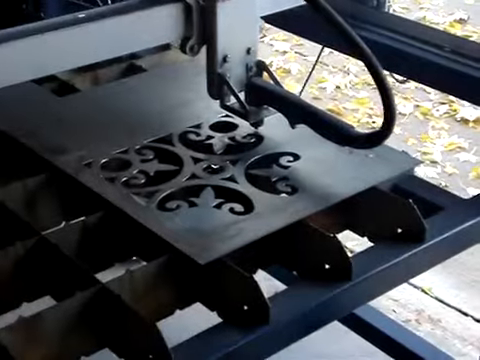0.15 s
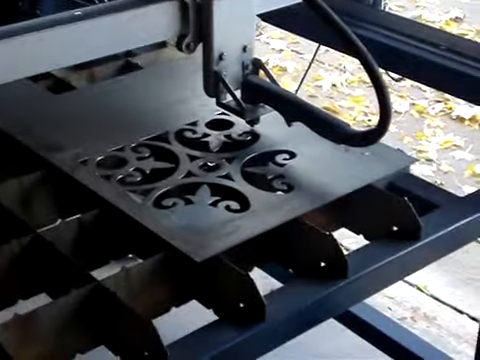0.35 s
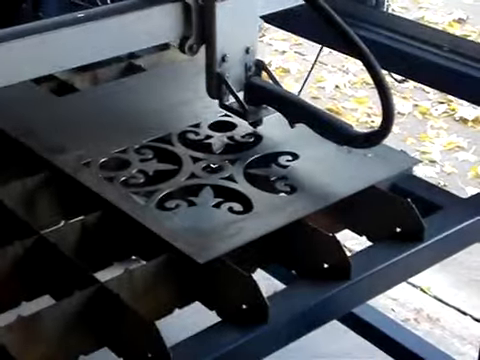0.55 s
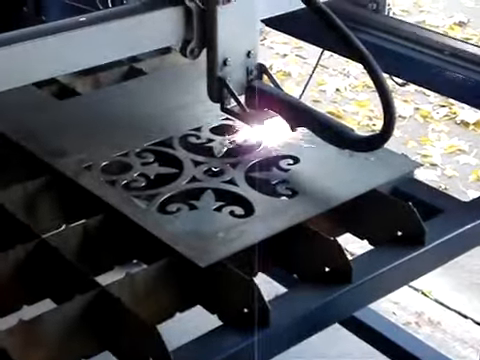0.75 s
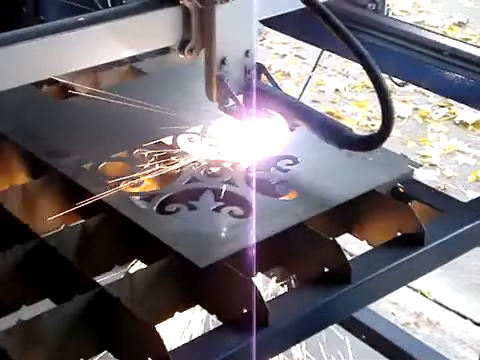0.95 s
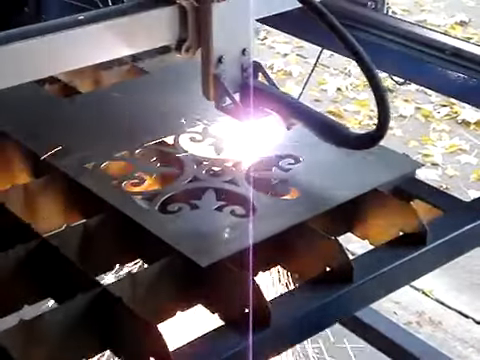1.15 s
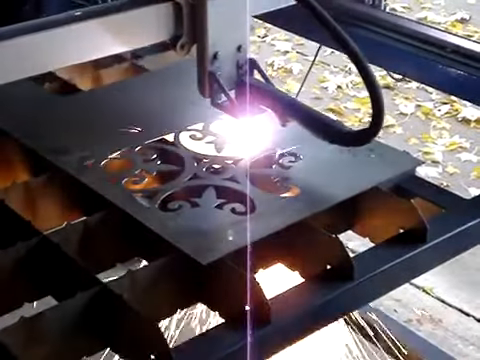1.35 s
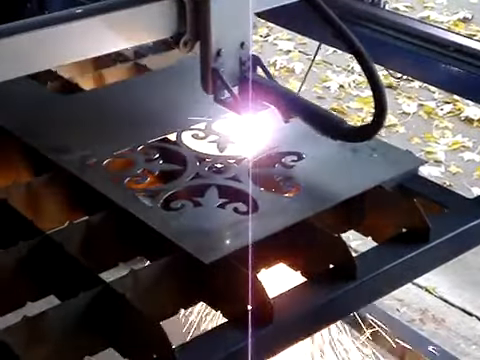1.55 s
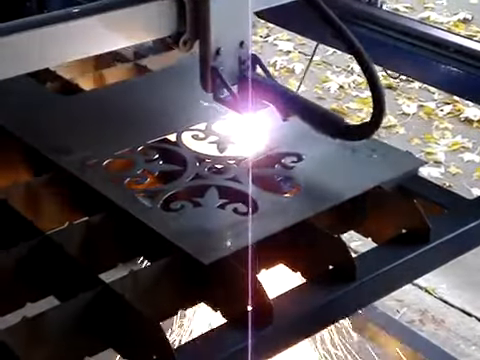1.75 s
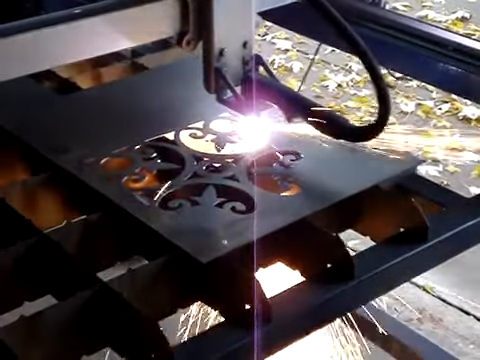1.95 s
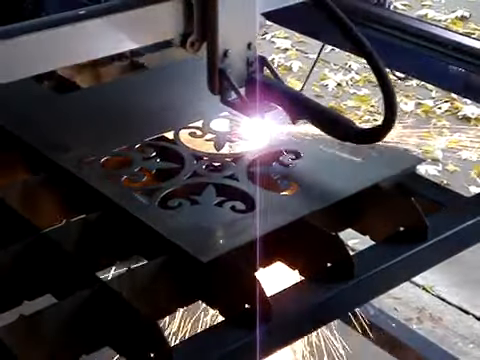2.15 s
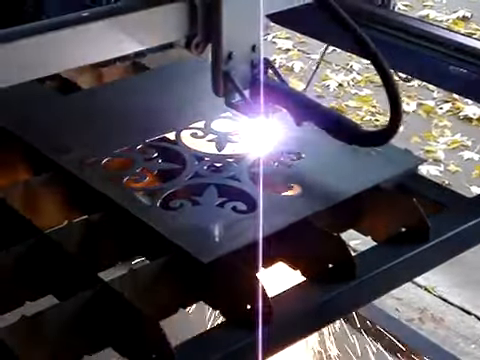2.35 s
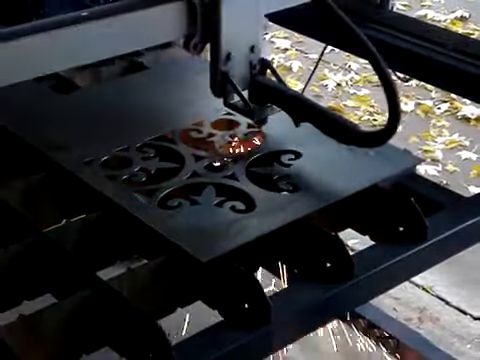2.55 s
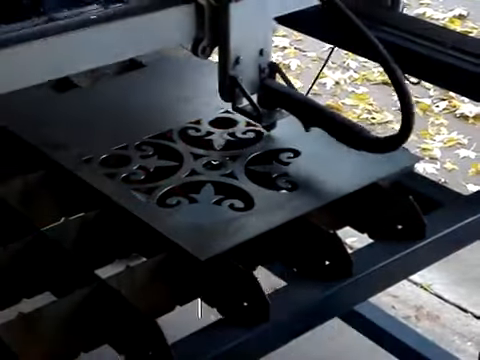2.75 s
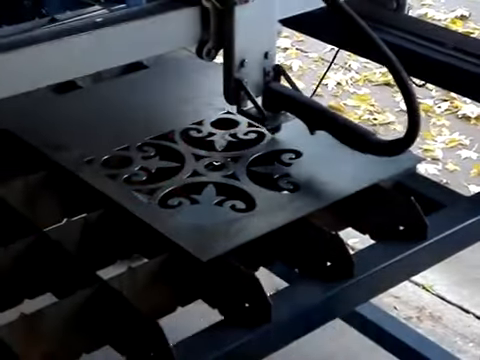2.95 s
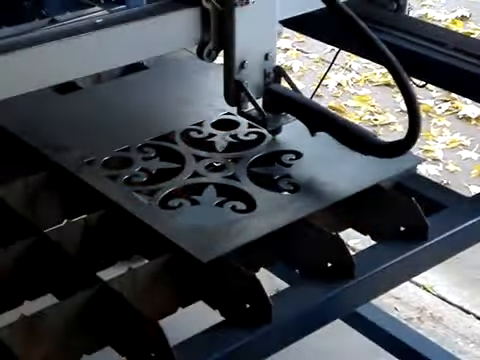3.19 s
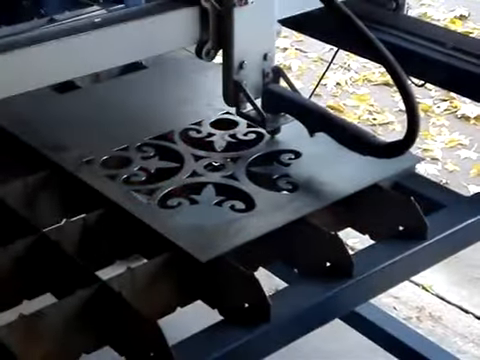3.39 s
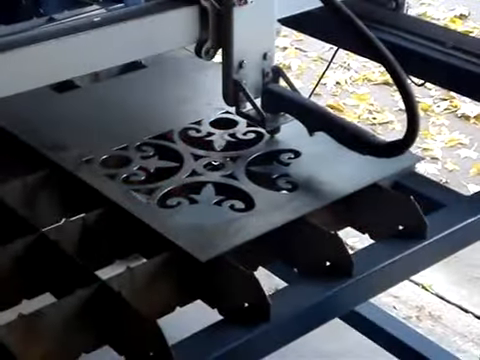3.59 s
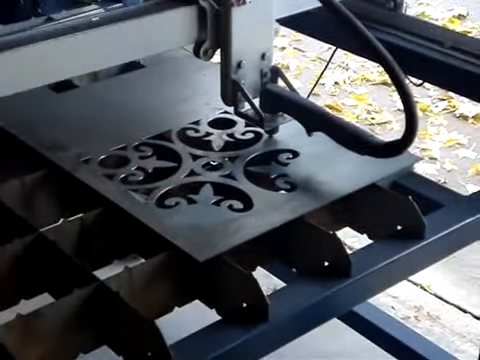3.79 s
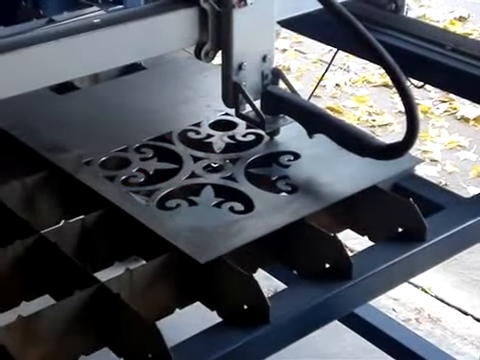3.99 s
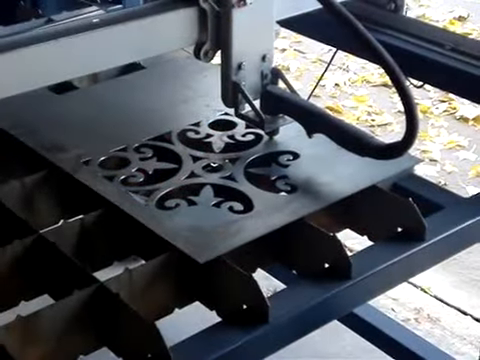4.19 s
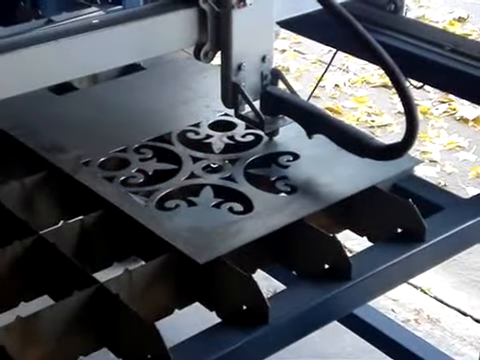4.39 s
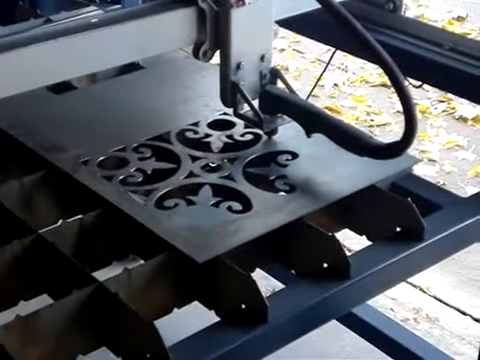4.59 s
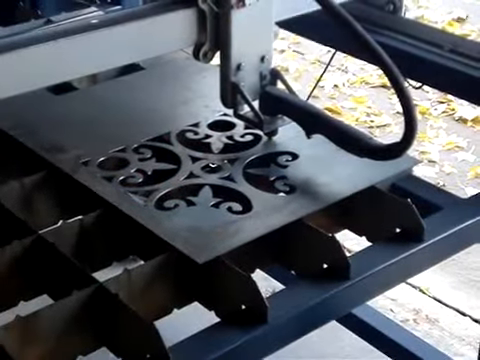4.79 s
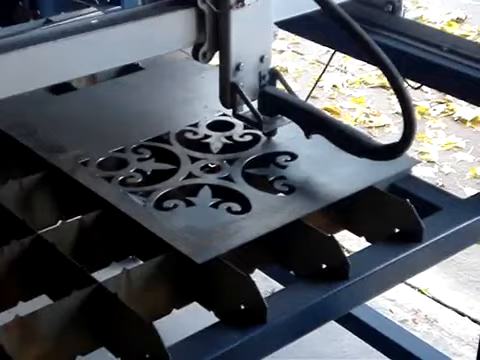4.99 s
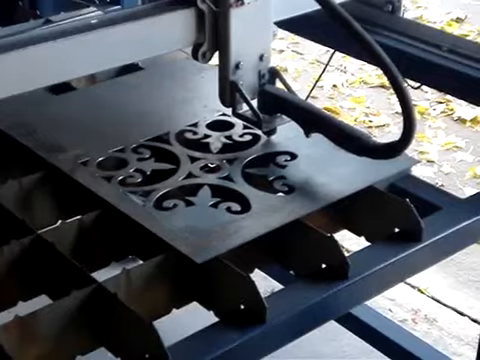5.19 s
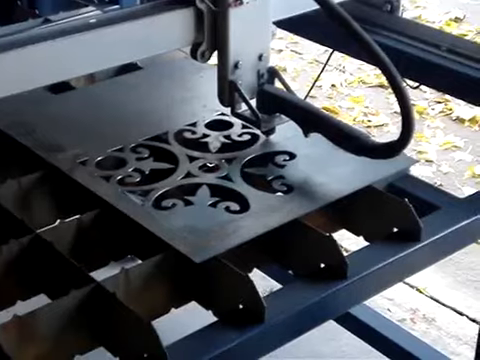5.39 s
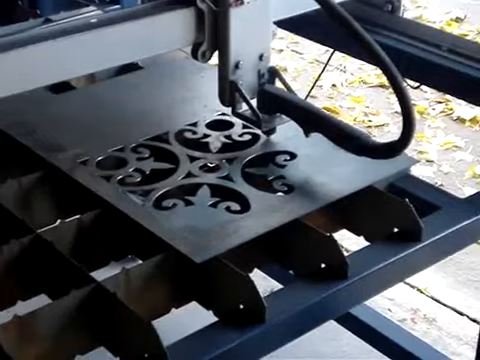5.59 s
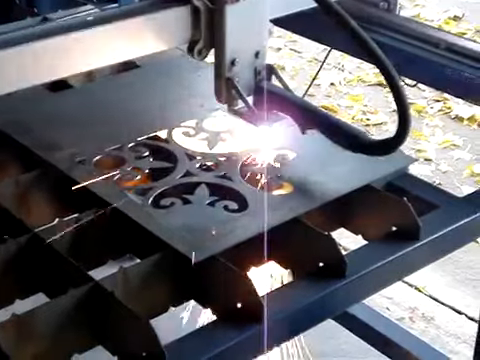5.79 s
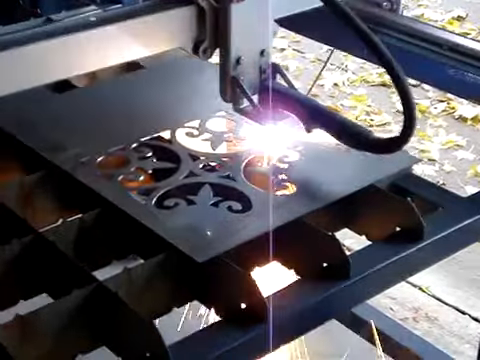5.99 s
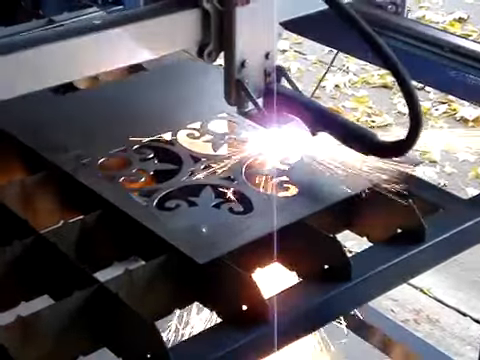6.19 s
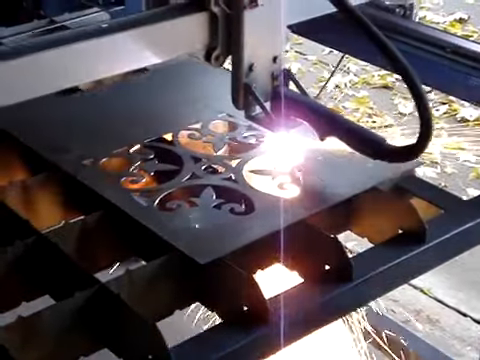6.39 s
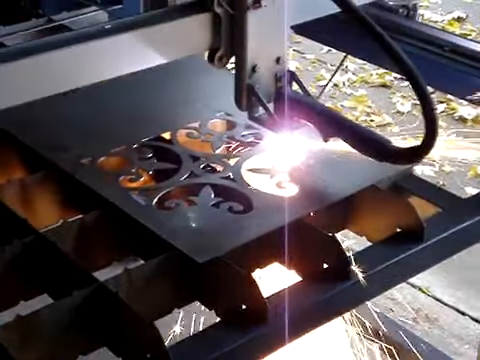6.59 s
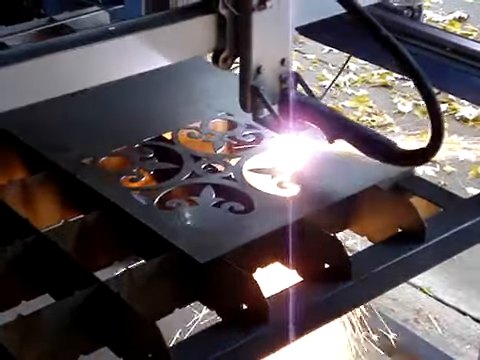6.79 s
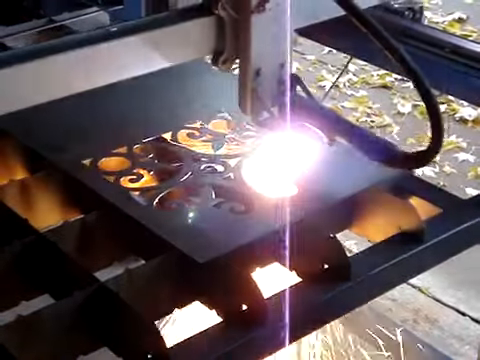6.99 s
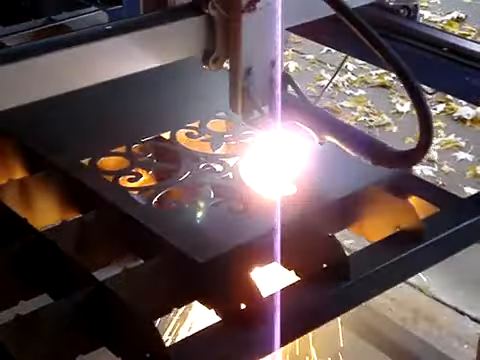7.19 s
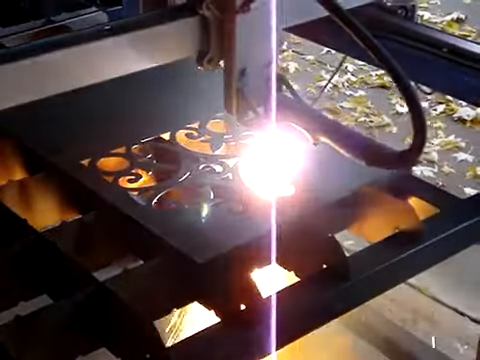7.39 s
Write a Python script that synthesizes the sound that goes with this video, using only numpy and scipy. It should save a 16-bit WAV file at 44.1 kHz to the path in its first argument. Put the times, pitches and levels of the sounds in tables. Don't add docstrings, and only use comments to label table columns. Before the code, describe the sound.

Outdoors, a compressor drones under a bright air jet; a plasma arc thumps on, cuts with rough roar, goes out, pauses, and cuts again.

```python
import sys
import numpy as np
from scipy import signal
from scipy.io import wavfile
from scipy.ndimage import uniform_filter1d

SR = 44100
rng = np.random.default_rng(int(sys.argv[2]) if len(sys.argv) > 2 else 0)


def generate_wav(signal):
    frames = np.transpose(np.atleast_2d(signal))
    scaled = np.clip(frames, -1, 1) * 32767
    pcm = np.round(scaled).astype(np.int16)
    wavfile.write(sys.argv[1], SR, pcm)


def nominal_scale(level):
    x = np.asarray(level, float) / 20
    return 10 ** x


N = 328545

# start_s, end_s
CUTS = [
    (.89, 2.65),
    (5.8, 7.5),
]
ARC_OUT_S = 2.625

# after_strike_s, jet_db, roar_db
PIERCE = [
    (-.6, -40.5, -45),
    (-.45, -40.5, -40),
    (-.39, -42.5, -42.5),
    (-.33, -46, -41),
    (-.18, -44.2, -40.5),
    (-.01, -41.5, -37.5),
    (.02, -38.5, -56),
    (.057, -43.5, -51),
    (.08, -40, -43),
]
# after_arc_out_s, jet_db, roar_db
SHUT_OFF = [
    (-.05, -39, -44),
    (0, -42, -40.5),
    (.055, -45.5, -50),
    (.16, -43, -45),
    (.3, -40.5, -45.5),
]
# time_s, bite_db
BITE = [(1.18, .5), (1.5, -2.5), (1.75, 1), (1.9, -2.5), (2.1, 2), (2.45, -0.5), (6.2, 4), (6.4, 2),
        (6.9, 2), (7.1, 1.5), (7.45, -3)]

# frequency_hz, density_db (per Hz)
JET_SPECTRUM = [(1470, -18.5), (2500, -9), (2690, -5.5), (2910, -7), (3270, -12.5), (4260, -8.5),
                (4590, -5), (5700, -3.5), (7660, -2.5), (9080, -11.5), (9720, -19.5), (12600, -51),
                (21400, -120)]
# frequency_hz, density_db (per Hz)
ROAR_SPECTRUM = [(350, -27), (650, -8.5), (900, -6), (1400, -2.5), (2000, -4), (2800, -4.5), (3400, -3.5),
                 (4400, -4.5), (5600, -17.5), (7000, -25)]

# start_before_s, end_before_s, start_hz, end_hz, width_hz, level_db
SINKING_WHISTLES = [
    (.55, .29, 5800, 4300, 1700, -34),
    (.32, -.005, 5000, 4750, 1500, -35.5),
]
RISING_WHISTLE = 0.3, 4999, 5331.5, 1300, -36.5
# start_s, end_s, pitch_hz, width_hz, level_db
KERF_WHISTLES = [(.95, 1.705, 3920, 130, -43.5), (1.0, 1.203, 4600, 350, -42), (1.1, 2.3, 1700, 200, -46.5),
                 (1.24, 1.41, 6220, 200, -52), (1.45, 2.353, 2986, 450, -42.5), (1.6, 2.2, 7570, 400, -45),
                 (1.7, 2.3, 4840, 300, -44), (2.05, 2.306, 4040, 200, -44), (2.9, 4.904, 7530, 250, -44.5),
                 (3.2, 4.102, 5990, 250, -50), (6.1, 6.95, 1452, 80, -44.5),
                 (6.049, 6.448, 5530, 800, -40.5), (6.3, 6.806, 2750, 320, -40),
                 (6.35, 6.598, 4330, 600, -38), (6.4, 6.903, 2100, 130, -43), (6.7, 7.0, 6600, 300, -48)]

# pitch_hz, level_db, t60_s
PIECE_MODES = [
    (5340, -40.5, 0.22),
    (7600, -48, .2),
]

# pitch_hz, level_db
DRONE_ORDERS = [(118.4, -61), (177.6, -61), (236.9, -52), (290.7, -56), (323.0, -64), (349.9, -65),
                (409.1, -47), (468.3, -59), (527.6, -42), (586.8, -52), (646.0, -52), (705.2, -51),
                (759.0, -49), (818.3, -49), (877.5, -41), (936.7, -59), (995.9, -38), (1055, -37), (1114, -47),
                (1174, -40), (1233, -52), (1287, -45), (1346, -50), (1437, -58), (1464, -50), (1523, -45),
                (1642, -56),
                (1760, -46), (1814, -45), (1873, -50), (1933, -41), (1992, -50), (2051, -55), (2110, -56),
         (2169, -61), (2283, -59), (2342, -55), (2401, -52), (2460, -46), (2519, -51), (2638, -56),
         (2810, -52), (2869, -51), (2929, -53), (3106, -56), (3575, -57), (3693, -57), (3865, -58),
         (4043, -57), (4452, -53), (4630, -52)]
KNOCKS = [
    (1, .1333, .0171),
    (.57, .5061, .0151),
    (.69, .4112, -.0123),
]
THUD = 5.39, .7315, -.4854
# frequency_hz, density_db (per Hz)
CASING_SPECTRUM = [(88, -53), (150, -18), (406, -14.5), (466, -10), (527, -14.5), (815, -5.5), (1020, -3),
                   (1640, -10.5), (1790, -8), (2200, -32), (2450, -10), (6070, -8), (9720, -24),
                   (12600, -68), (21400, -120)]

# frequency_hz, density_db (per Hz)
DRAUGHT_SPECTRUM = [(5.9, -44), (10, 0), (181, -15.5), (232, -12), (355, -17), (398, -20.5), (500, -10),
                    (650, -28.5), (1100, -120)]
# time_s, level_db
BIAS_STEPS = [
    (.895, -32),
    (5.806, -33),
]


def torch():
    levels = torch_levels()
    hiss = nominal_scale(curve(levels) + 7.0) * noise(JET_SPECTRUM, patch_db=2.0, gust_db=0.42)
    roar = nominal_scale(curve(levels, column=2) + 5.5) * sputter() * noise(ROAR_SPECTRUM, patch_db=1.5, gust_db=0.0)
    return (hiss + roar + whistles()) / nominal_scale(gain_db())


def torch_levels():
    cut_jet_db, cut_roar_db = -40, -43
    jet_share = 0.25
    rows = [(strike + s, jet, roar) for strike, _ in CUTS for s, jet, roar in PIERCE]
    rows += [(ARC_OUT_S + s, jet, roar) for s, jet, roar in SHUT_OFF]
    rows += [(s, cut_jet_db + jet_share * bite, cut_roar_db + bite) for s, bite in BITE]
    return sorted(rows)


def sputter():
    depth_db, step_s = 1.6, 0.02
    t = np.arange(N) / SR
    burning = sum((t > strike) & (t < out) for strike, out in CUTS)
    steps = rng.standard_normal(int(N / SR / step_s) + 2)
    flicker = np.interp(t, np.arange(len(steps)) * step_s, steps)
    return nominal_scale(depth_db * burning * flicker)


def whistles():
    kerf_drift = 0.02
    rows = [(strike - a, strike - b, *rest) for strike, _ in CUTS for a, b, *rest in SINKING_WHISTLES]
    rising_s, *rising = RISING_WHISTLE
    rows.append((ARC_OUT_S - rising_s, ARC_OUT_S, *rising))
    rows += [(a, b, hz, hz * (1 + kerf_drift), width, db) for a, b, hz, width, db in KERF_WHISTLES]
    return sum(whistle(*row) for row in rows)


def whistle(start_s, end_s, from_hz, to_hz, width_hz, level_db):
    share = np.clip((np.arange(N) / SR - start_s) / (end_s - start_s), 0, 1)
    on = (share > 0) & (share < 1)
    pole = np.exp(-np.pi * width_hz / SR)
    grain = rng.standard_normal((on.sum(), 2)) @ [1, 1j]
    fuzz = signal.lfilter([1], np.convolve([1, -pole], [1, -pole]), grain)
    pitch_hz = from_hz + (to_hz - from_hz) * share[on]
    carrier = np.exp(2j * np.pi * np.cumsum(pitch_hz) / SR)
    out = np.zeros(N)
    out[on] = nominal_scale(level_db) * evened((fuzz * carrier).real) * np.sqrt(np.sin(np.pi * share[on]))
    return out


def piece():
    drop_s, attack_s = 2.73, 0.0023
    t = np.maximum(np.arange(N) / SR - drop_s, 0)
    ring = sum(nominal_scale(db - 60 * t / t60) * np.sin(2 * np.pi * hz * t) for hz, db, t60 in PIECE_MODES)
    return nominal_scale(55) * ring * (1 - np.exp(-t / attack_s))


def compressor():
    turn_hz, sag_hz = 58.59, 0.024
    casing_db = 1.5
    t = np.arange(N) / SR
    loaded = sum((t > strike) & (t < out) for strike, out in CUTS)
    angle = 2 * np.pi * np.cumsum(turn_hz - sag_hz * loaded) / SR
    hz, db = np.transpose(DRONE_ORDERS)
    order = np.round(2 * hz / turn_hz) / 2

    top_order, *thud = THUD
    blows = KNOCKS + [(5 * np.exp(-(order / top_order) ** 4), *thud)]
    blow_sum = sum(share * np.exp(2j * np.pi * (lag * order ** 2 / 2 - place * order))
                   for share, place, lag in blows)
    phase = np.angle(blow_sum)

    hop = 2048
    waver = np.cumsum(rng.standard_normal((len(hz), N // hop + 2)), axis=1)
    waver = 1.2 * (waver - uniform_filter1d(waver, size=9, axis=1))
    drone = np.zeros(N)
    for k, level, start, drift in zip(order, db, phase, waver):
        loudness = np.interp(t, np.arange(len(drift)) * hop / SR, nominal_scale(level + drift))
        drone += loudness * np.cos(k * angle + start)

    throb = 1 + 0.067 * np.cos(angle + 0.5) + 0.13 * np.cos(2 * angle)
    casing = nominal_scale(casing_db) * throb * noise(CASING_SPECTRUM, patch_db=2.0, gust_db=0.3)
    return nominal_scale(12.0) * evened(drone) + casing


def draught():
    level_db = -59.5 + 0.8 * (curve(torch_levels()) + 40)
    return nominal_scale(level_db) * noise(DRAUGHT_SPECTRUM, patch_db=1.5, gust_db=1.1, size=2048)


def thump():
    block_hz, shift_s = 4.9, 0.0052
    t = np.arange(N) / SR
    bias = sum(-nominal_scale(db) * (1 - np.exp(-np.maximum(t - s, 0) / shift_s)) for s, db in BIAS_STEPS)
    return signal.lfilter(*signal.butter(1, block_hz, "high", fs=SR), bias)


def gain_db():
    idle_db, cut_db, ceiling_db = -41.4, -49, -31.5
    lull_s, creep_db_per_s = 0.59, 19
    snap_s, recover_s = 0.004, 0.089
    bite_duck = 0.13
    climb_s = min((ceiling_db - idle_db) / creep_db_per_s, lull_s - snap_s)
    steps = [(-lull_s, idle_db), (climb_s - lull_s, ceiling_db), (-snap_s, ceiling_db),
             (snap_s, -39),
             (0.023, -52),
             (0.049, -56.5),
             (0.12, -46)]
    rows = [(strike + s, db) for strike, _ in CUTS for s, db in steps]
    rows += [(ARC_OUT_S, cut_db), (ARC_OUT_S + 1, cut_db)]
    rows += [(s, cut_db - bite_duck * bite) for s, bite in BITE]
    since = np.arange(N) / SR - ARC_OUT_S
    recovery = idle_db + (cut_db - idle_db) * np.exp(-np.maximum(since, 0) / recover_s)
    second_strike_s = CUTS[1][0]
    between_cuts = (since > 0) & (since < second_strike_s - lull_s - ARC_OUT_S)
    return np.where(between_cuts, recovery, curve(sorted(rows)))


def noise(spectrum, patch_db, gust_db, size=1024):
    hop = size // 4
    frames, hz = N // hop + 5, np.fft.rfftfreq(size, 1 / SR)
    real, imag, patches = rng.standard_normal((frames, len(hz), 3)).T
    real, imag, patches = real, imag, uniform_filter1d(patches, size=3, axis=0)
    patches = evened(uniform_filter1d(patches, size=12, axis=1))
    gusts = evened(uniform_filter1d(rng.standard_normal(frames), size=8))
    level_db = read(spectrum, hz)[:, None] + patch_db * patches + gust_db * gusts
    z = (real + 1j * imag) * nominal_scale(level_db)
    return evened(signal.istft(z, nperseg=size, noverlap=size - hop)[1][:N])


def read(points, hz):
    f, value = np.transpose(points)
    return np.interp(np.log(hz + 1), np.log(f + 1), value, left=-100, right=-100)


def curve(rows, column=1):
    rows = np.array(rows)
    return np.interp(np.arange(N) / SR, np.sort(rows[:, 0]), rows[:, column])


def evened(x):
    return x / np.sqrt(np.mean(x ** 2) + 1e-20)


def scene():
    return (torch() + piece() + compressor())[None]


def roll_off(x):
    return signal.sosfilt(signal.butter(12, 9870, fs=SR, output="sos"), x)


def record(dry):
    edge_hz = 10100
    heard = dry * nominal_scale(gain_db()) + thump() + draught()
    lowpass = signal.firwin(511, edge_hz, window=("kaiser", 9), fs=SR)
    mix = signal.oaconvolve(heard, lowpass[None], "same")
    return roll_off(mix)


dry = scene()
out = record(dry)
generate_wav(out)
```